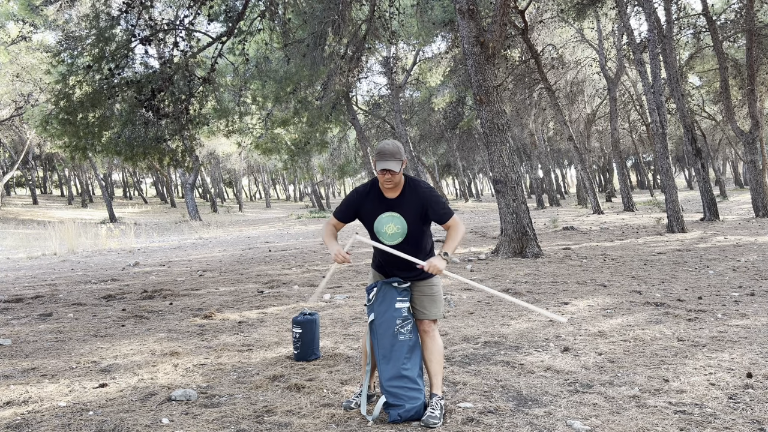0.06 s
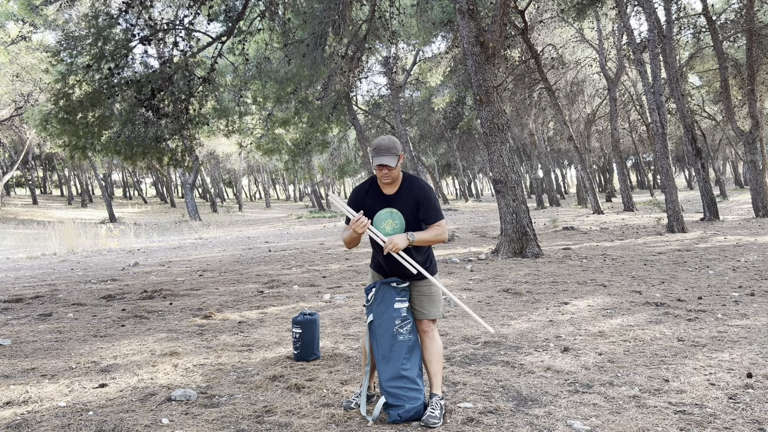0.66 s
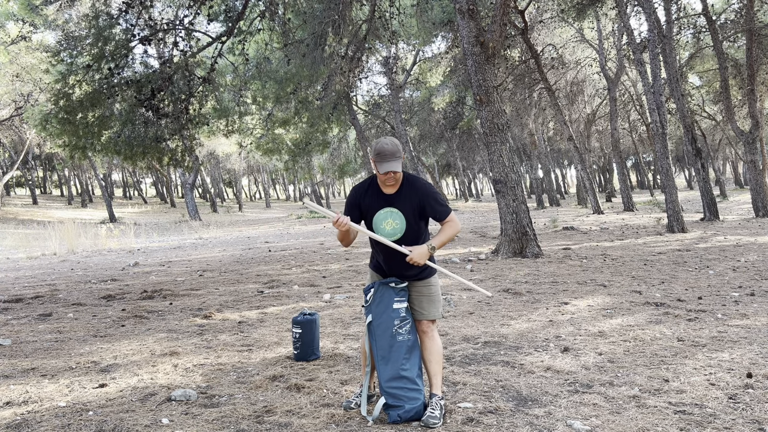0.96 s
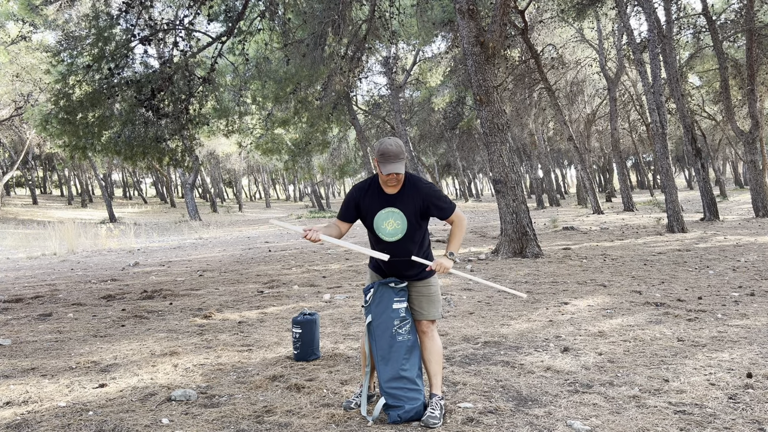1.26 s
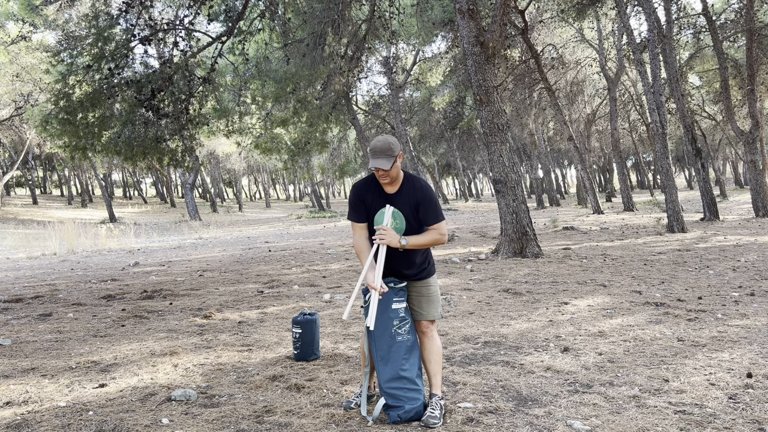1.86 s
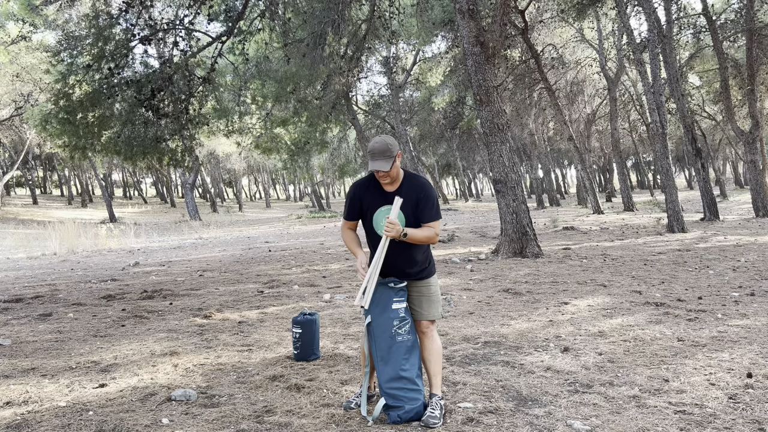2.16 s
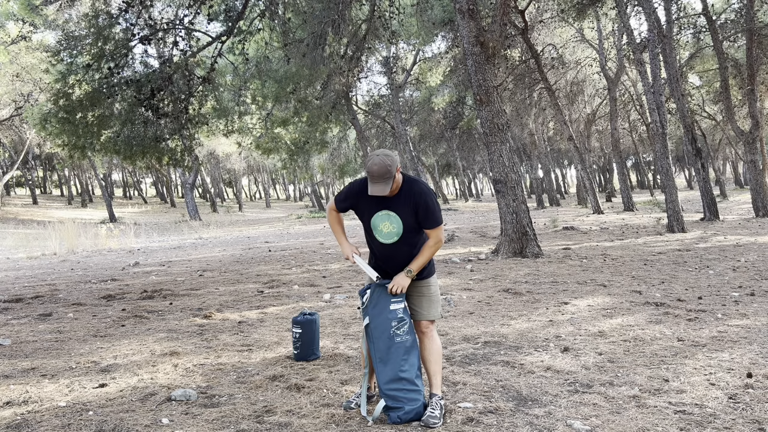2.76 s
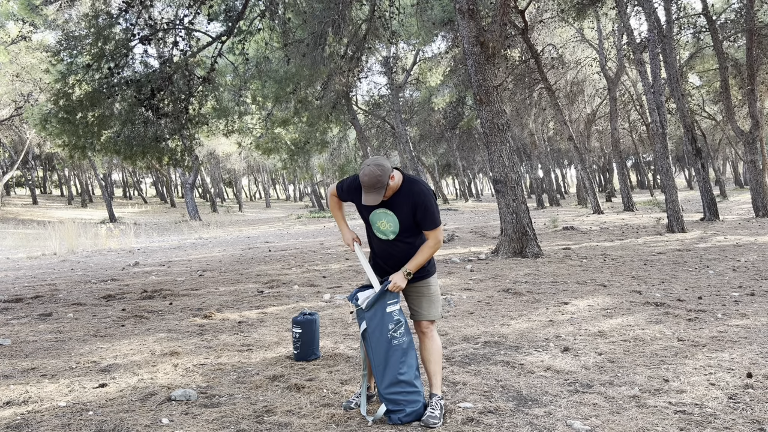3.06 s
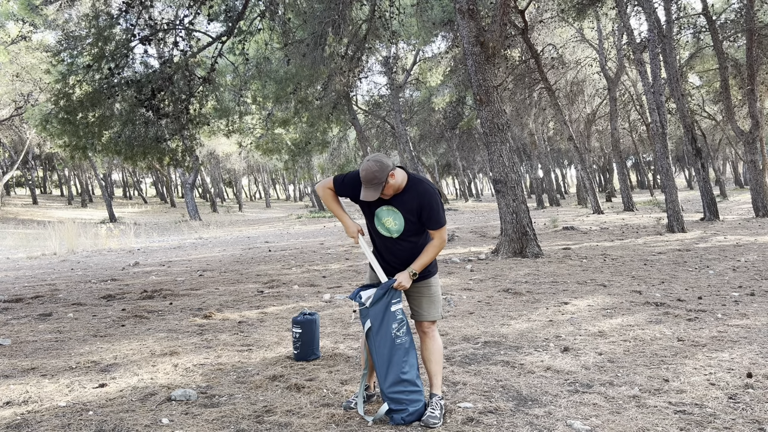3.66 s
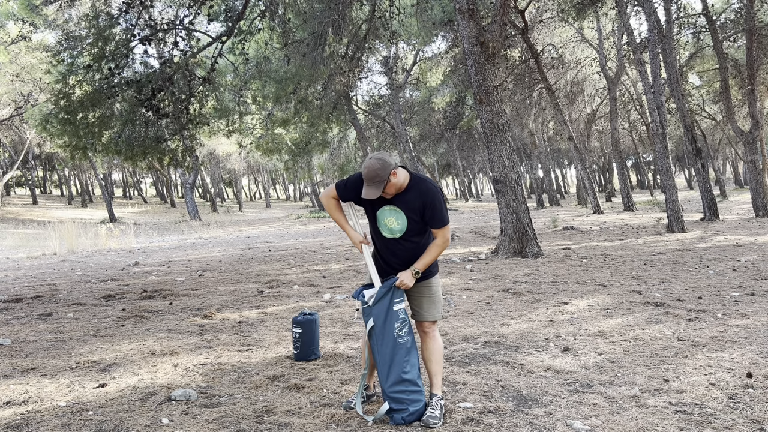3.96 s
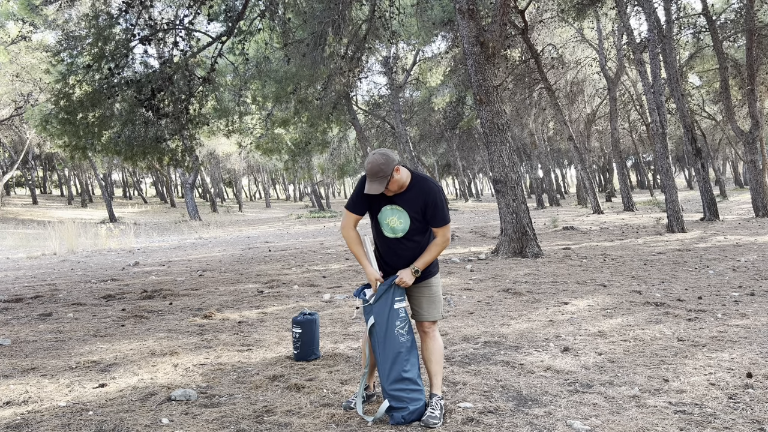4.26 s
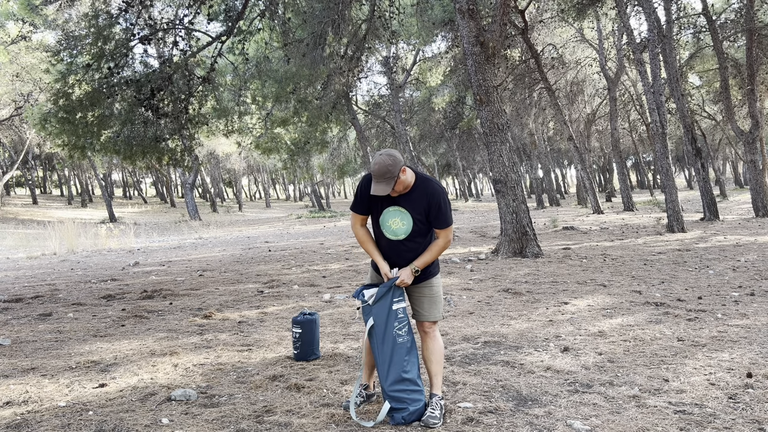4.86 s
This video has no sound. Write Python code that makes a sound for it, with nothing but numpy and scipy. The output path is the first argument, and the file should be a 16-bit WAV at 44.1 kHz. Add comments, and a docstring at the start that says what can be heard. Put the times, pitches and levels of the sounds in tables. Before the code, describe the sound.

In a wood full of buzzing cicadas, with a faint engine drone in the distance, metal poles are gathered a few metres from the microphone. They clink and knock in irregular clusters over a low early breeze. One squeaks lightly, then the poles go into a cloth bag with rustling, small pops and dull thumps, rubbing and squealing briefly before a few last clicks.

```python
"""Metal camp bed poles are packed into a fabric bag in a pine wood.
From the start cicadas buzz, a far engine drones and a breeze pushes on the microphone.
The poles are pulled apart and gathered: they clack together and ring briefly in the hand.
Around 2 s the breeze dies down and a rubbed pole squeaks. From about 2.8 s the bag rustles and
snaps as the poles thump into it, and from 4 s they slide along each other, hissing and squealing."""
import sys
import numpy as np
from scipy import signal
from scipy.fft import rfft, irfft
from scipy.io import wavfile

SR = 44100
rng = np.random.default_rng(int(sys.argv[2]) if len(sys.argv) > 2 else 0)


def wav_record(signal):
    """Record a signal, one row per channel, as 16-bit PCM in the file named by sys.argv[1]."""
    frames = np.transpose(np.atleast_2d(signal))
    bounded = np.clip(frames, -1, 1)
    # unit amplitude maps onto the largest positive 16-bit level
    quanta = np.round(bounded * 32767).astype(np.int16)
    wavfile.write(sys.argv[1], SR, quanta)


N = 225586
TIME = np.arange(N) / SR

# Tone of the air in the wood: pitch_hz, level_db
AIR_TONE = [(20, -19), (35, 2.5), (85, -1.5), (140, -3.5), (200, -6.5), (300, -13.5), (450, -11), (630, -8),
            (1000, -13.5), (1400, -19), (2000, -22), (4000, -80), (16000, -71)]
# The breeze dying down: time_s, level_db
BREEZE_LEVELS = [(0, -22), (1.8, -27), (2.2, -41.5), (5.12, -43)]
# Tone of gusts on the microphone: pitch_hz, level_db
GUST_TONE = [(0, -17), (2, 4.5), (5, 3), (10, -12), (20, -46), (35, -53), (100, -99), (400, -110)]
# Tone of the cicada chorus: pitch_hz, level_db
CICADA_TONE = [(1900, -25), (2700, -11.5), (3450, -6.5), (4000, -15), (4850, -15.5), (5400, -4),
               (6250, 2.5), (6900, -2.5), (7700, -12), (9600, -15.5), (11000, -20.5), (11800, -28.5),
               (14000, -34), (15800, -41)]
# Pole hits pole: start_s, strength_db, brightness_db, top_treble_db, favoured_pitch_hz, contact_s,
# looseness (a looser grip multiplies the ring time)
POLE_HITS = [(0.0458, -38, 0, 0.5, 3930, 0.0081, 0.72), (0.083, -45.5, 1, -3, 2630, 0.011, 0.77),
             (0.1084, -45.5, 7.5, 3, 3740, 0.0051, 0.9), (0.1665, -36.5, 0, -4, 2390, 0.0034, 0.76),
             (0.1702, -32, 12, 3, 3330, 0.0079, 0.41), (0.254, -43.5, 8.5, 8, 4350, 0.0069, 0.79),
             (0.2975, -28.5, 12, 3.5, 4500, 0.0074, 0.94), (0.3057, -31, 6, 0, 4560, 0.0025, 0.75),
             (0.3187, -37, 15, 6, 5915, 0.0059, 0.66), (0.87, -55, 0, -2, 3740, 0.0061, .8),
             (1.125, -53, 4, 1, 4610, 0.0063, 1.9), (1.1702, -49, 5.5, 7, 2720, 0.0063, 0.42),
             (1.542, -39.5, -7, 5, 2450, 0.013, 1), (1.5776, -48, -2, -3, 1625, 0.002, 0.79),
             (1.725, -41, 6.5, 5, 2790, 0.0046, 1.3), (1.752, -38.5, 1.5, -4, 1440, 0.0077, 0.81),
             (1.8015, -41.5, 5, -6, 4830, 0.0031, 0.73), (1.832, -50, 1, -7, 1440, .004, 1.),
             (1.8914, -29.5, 0, 3.5, 2520, .011, 0.7), (2.141, -48.5, -2, -1, 2330, 0.0075, 0.99),
             (2.3885, -30.5, 3, -4.5, 2050, 0.011, 0.45), (3.1039, -26.5, -0.5, 3.5, 1570, 0.013, 0.58),
             (3.1153, -27.5, -0.5, -4, 2340, 0.011, 0.43), (3.1914, -48.5, 0, 0, 3550, 0.0096, 1),
             (3.9505, -30.5, 0, -1.5, 3700, 0.0062, 0.37), (4.146, -29.5, -1, 0.5, 2354, 0.01, 0.34),
             (4.2025, -46, -2, 1, 2530, 0.0089, 1.1), (4.2412, -42.5, 2, -2, 3540, .007, 1.1),
             (4.308, -32.5, 0, -9, 3450, 0.01, 1.15), (4.427, -30, -3.5, 6, 2335, 0.0076, 0.66),
             (4.4664, -27.5, -4.5, 6.5, 2450, 0.012, 0.57), (4.5094, -38, -7.5, 1, 2480, 0.0026, 0.51),
             (4.862, -46.5, 1, -3, 3470, 0.0026, 1.), (4.9942, -37.5, 2.5, 10.5, 3760, .0055, 0.98),
             (5.0795, -34, 0, -4, 1180, 0.0099, 0.8)]
# The notes a tube rings at: pitch_hz, level_db, ring_s (time to fade by 60 dB)
TUBE_NOTES = [(1190, -22.5, 0.06), (1456, -2.5, 0.14), (1576, -4.5, 0.049), (1671, -13, 0.15),
              (1904, -11, 0.11), (2042, -5, 0.044), (2322, -4.5, 0.14), (2450, -4, 0.077),
              (2670, -25.5, 0.11), (2768, -7, 0.077), (3270, -16, 0.076), (3426, 0.5, 0.083),
              (3547, -10, 0.22), (3733, 0.5, 0.029), (4700, -6.5, 0.2), (4747, -12.5, 0.11),
              (5902, -2.5, 0.072), (7420, -12, 0.14), (8140, -7, 0.18), (8770, -6, 0.07), (9500, -9, 0.075),
              (10150, -11, 0.075), (10800, -34, 0.084), (10900, -11.5, 0.067), (11730, -15.5, 0.04),
              (12600, -15, 0.056)]
# Tone of metal striking metal: pitch_hz, level_db
CONTACT_TONE = [(80, -20), (200, -3), (700, 4), (1150, -4.5), (1600, -7.5), (2400, -2.5), (3600, -1),
                (4500, -3), (5300, -10), (7500, -23.5), (10000, -14), (13000, -22), (16000, -37)]
# Borders between a hit's thud, body, clink and sparkle: pitch_hz
BAND_EDGES_HZ = [950, 2900, 6800]
# The two notes that lead in most hits: low_hz, high_hz
LEAD_HZ = (2405, 3386)
# A rubbed tube catches and sings: start_s, length_s, pitch_hz, level_db
SQUEALS = [(2.075, 0.015, 1900, -45.5), (2.139, .018, 1860, -48), (4.025, 0.12, 2330, -53),
           (4.219, 0.058, 2490, -44), (4.431, 0.038, 2303, -31), (4.465, 0.033, 2504, -32.5)]
# Higher notes that join in: pitch_hz, level_db (against the main note of a hard squeal)
SQUEAL_HIGH_NOTES = [(3455, -2), (4620, -9.5), (9036, -13), (11150, -11.5)]
# The bag is tugged over the poles: start_s, hold_s, level_db
BAG_TUGS = [(2.76, 0.34, -53), (3.13, 0.23, -52.5), (3.38, 0.54, -59), (3.96, 0.41, -53),
            (4.425, 0.05, -36.5), (4.72, 0.17, -54)]
# Tone of rubbing cloth: pitch_hz, level_db
CLOTH_TONE = [(80, 3.5), (200, -4), (550, 8.5), (900, -3), (1500, -1.5), (2600, -14), (6000, -12),
              (15000, -29)]
# The cloth snaps tight: start_s, level_db, fade_s
CLOTH_SNAPS = [(2.845, -46, .0026), (2.911, -47.5, 0.0044), (2.952, -48.5, 0.0029), (3.033, -46, 0.006),
               (3.054, -50.5, .004), (3.143, -43.5, 0.0078), (3.28, -48.5, 0.0046), (3.384, -48.5, .008),
               (3.495, -43, 0.0017), (3.624, -45.5, 0.0061), (3.87, -51.5, 0.0065), (3.995, -46, .005)]
# Tone of a snap: pitch_hz, level_db
SNAP_TONE = [(120, -16), (350, 3), (700, 6), (1400, 2.5), (2100, 2.5), (2800, -6.5), (5000, 0),
             (14000, -32)]
# A pole bumps the ground through the bag: start_s, level_db, pitch_hz
GROUND_THUMPS = [(3.107, -45.5, 286), (3.949, -47, 304), (4.428, -40, 180), (4.468, -54, 208)]
# A pole slides along the others: start_s, hold_s, level_db
POLE_SLIDES = [(4.0, 0.077, -54), (4.2, .15, -51), (4.38, 0.16, -50.5)]
# Tone of the sliding hiss: pitch_hz, level_db
SLIDE_TONE = [(300, -8), (1500, 4), (2500, 1), (5000, -27), (9000, -1), (12000, -8), (16000, -18)]


def amp(db):
    """Turns decibels into a number to multiply by."""
    return 10 ** (np.asarray(db) / 20)


def unit(x):
    """Scales a sound to an average (rms) level of 1."""
    return x / np.sqrt(np.mean(x ** 2) + 1e-20)


def colour(x, tone):
    """Shapes the lows and highs of a sound by a tone table, at level 1."""
    hz, db = np.transpose(tone)
    f = np.fft.rfftfreq(len(x), 1 / SR)
    gain = amp(np.interp(np.log(f + 1), np.log(hz + 1), db))
    return unit(irfft(rfft(x) * gain, len(x)))


def wander(rate_hz):
    """A smooth random wobble, up to about rate_hz swings a second."""
    f = np.fft.rfftfreq(N, 1 / SR)
    return unit(irfft(rfft(rng.standard_normal(N)) / (1 + (f / rate_hz) ** 4), N))


def add(mix, start_s, sound):
    """Lays a sound into the mix."""
    part = mix[max(round(start_s * SR), 0):][:len(sound)]
    part += sound[:len(part)]


def at_level(x, db, first_s=0.019):
    """Scales a hit so that its first moments have the given level."""
    return x * amp(db) / np.sqrt(np.mean(x[:int(first_s * SR)] ** 2) + 1e-20)


def bands(x):
    """Splits a hit, low to high, into thud, body, clink and sparkle."""
    for edge_hz in BAND_EDGES_HZ:
        yield signal.sosfilt(signal.butter(8, edge_hz, fs=SR, output="sos"), x)
        x = signal.sosfilt(signal.butter(8, edge_hz, "high", fs=SR, output="sos"), x)
    yield x


def strokes(rows, rise_s, fade_s):
    """Loudness of hand movements: each swells, holds and dies away."""
    loudness = np.zeros(N)
    for start_s, hold_s, db in rows:
        swell = 1 - np.exp(-np.maximum(TIME - start_s, 0) / rise_s)
        fade = np.exp(-np.maximum(TIME - start_s - hold_s, 0) / fade_s)
        loudness += amp(db) * swell * fade
    return loudness


def air_and_breeze(air_db=-52):
    """Air makes a low, steady wash while gusts press on the microphone."""
    wash, gusts = rng.standard_normal((2, N))
    breeze = amp(np.interp(TIME, *np.transpose(BREEZE_LEVELS))) * signal.windows.tukey(N, .03)
    return amp(air_db) * colour(wash, AIR_TONE) + breeze * colour(gusts, GUST_TONE)


def cicadas(level_db=-47, buzz_db=0.25, swell_db=-0.06):
    """Countless clicks from the insects' drum-like skins blur into one band of buzzing noise."""
    chorus = rng.standard_normal(N) * amp(buzz_db * wander(260) + swell_db * wander(3.9))
    return colour(chorus, CICADA_TONE) * amp(level_db)


def far_engine(start_hz=58.8, sink_hz_per_s=1.7, drift_hz=1.93, hum_db=-56, octave_db=-60.5):
    """An engine hums on a low note and its octave, sinking in pitch and wavering in loudness."""
    cycles = np.cumsum(start_hz - sink_hz_per_s * TIME + drift_hz * wander(6.1)) / SR
    return sum(amp(db) * unit((1 + 0.3 * wander(3.1)) * np.sin(2 * np.pi * multiple * cycles))
               for multiple, db in ((1, hum_db), (2, octave_db)))


def clack(levels_db, favoured_hz, contact_s, looseness, ring_db, rise_s=.0007):
    """Two tubes chatter, then ring; the spot that is struck favours some notes over the rest."""
    t = np.arange(SR // 3) / SR
    hz, db, ring_s = np.array(TUBE_NOTES).T[:, :, None]
    chance, detune, phase = rng.standard_normal((3, len(TUBE_NOTES), 1))
    # The favoured pitch takes over from the nearer leading note.
    low_hz, high_hz = LEAD_HZ
    if favoured_hz < np.mean(LEAD_HZ):
        low_hz = favoured_hz
    else:
        high_hz = favoured_hz
    favour = np.exp(-((hz - low_hz) / 70) ** 2) + np.exp(-((hz - high_hz) / 90) ** 2)
    strength = amp(db * (1 - 0.71 * favour) - 0.1 * chance + 8 * favour)  # even a weak note can lead
    # While the tubes touch, their notes are broad humps that colour the chatter.
    f = np.fft.rfftfreq(len(t), 1 / SR)
    humps = (strength / (1 + ((f - hz) / 60) ** 2)).sum(0)
    crack = colour(rng.standard_normal(len(t)), CONTACT_TONE)
    chatter = unit(irfft(rfft(crack) * (1 + amp(6) * humps), len(t)))
    chatter /= 1 + (t / contact_s) ** 3
    # A tight grip stops the ring quickly; a faint tail lasts three times as long.
    fall_db = 60 * t / (ring_s * looseness * (1 + 0.096 * favour))
    fade = amp(-fall_db) + amp(-25 - fall_db / 3)
    # No two poles are tuned alike, least of all in their highest notes.
    tuning = 1 + detune * (0.0038 + 0.0069 * (hz > BAND_EDGES_HZ[-1]))
    ring = (strength * fade * np.sin(2 * np.pi * (hz * tuning * t + phase))).sum(0)
    hit = (chatter + amp(ring_db) * ring) * (1 - np.exp(-(t / rise_s) ** 2))
    return sum(at_level(part, level) for part, level in zip(bands(hit), levels_db))


def pole_clacks(bagged_from_s=2.8, sparkle_db=-12.5):
    """The poles knock together, with a heavier thud once they are going into the bag."""
    out = np.zeros(N)
    for start_s, db, bright_db, treble_db, favoured_hz, contact_s, looseness in POLE_HITS:
        body_db, clink_db = db - bright_db / 2, db + bright_db / 2
        # The thud is set against the body, the ring against the chatter.
        thud_db, ring_db = (-14, -10) if start_s > bagged_from_s else (-20.5, -10.5)
        levels_db = (body_db + thud_db, body_db, clink_db, db + sparkle_db + treble_db)
        add(out, start_s, clack(levels_db, favoured_hz, contact_s, looseness, ring_db))
    return out


def pole_squeals(hard_squeal_db=-33, pitch_waver=0.01, flutter_db=5.0):
    """A tube sticks and slips, singing one shaky note; harder rubbing wakes higher notes."""
    out = np.zeros(N)
    wobbles = [(wander(140), wander(98)) for _ in range(len(SQUEAL_HIGH_NOTES) + 1)]
    for start_s, length_s, main_hz, db in SQUEALS:
        span = slice(round(start_s * SR), round((start_s + length_s) * SR))
        high_db = db + (db - hard_squeal_db)  # softer squeals are purer
        notes = [(main_hz, db)] + [(hz, high_db + offset_db) for hz, offset_db in SQUEAL_HIGH_NOTES]
        for (hz, note_db), (bend, flutter) in zip(notes, wobbles):
            cycles = np.cumsum(hz * (1 + pitch_waver * bend[span])) / SR
            tone = np.sin(2 * np.pi * cycles) * amp(flutter_db * flutter[span])
            add(out, start_s, amp(note_db) * unit(tone * signal.windows.tukey(len(tone), .5)))
    return out


def bag_rustle(slips_per_s=2500, spread_db=1.7, clump_db=3):
    """Tugged cloth rubs in tiny slips of uneven size that come in clumps."""
    sizes = amp(spread_db * np.minimum(rng.exponential(1, N), 4)) * rng.standard_normal(N)
    slips = sizes * (rng.random(N) < slips_per_s / SR)
    rustle = colour(slips * amp(clump_db * wander(30)), CLOTH_TONE)
    return rustle * strokes(BAG_TUGS, rise_s=0.032, fade_s=0.037)


def bag_snaps(rise_s=0.0014, hump_db=3.5, hump_spacing_hz=350, dull_above_hz=3000):
    """Folds of the bag pull tight with a dull pop; each fold has a tone of its own."""
    out, t = np.zeros(N), np.arange(4096) / SR
    f = np.fft.rfftfreq(len(t), 1 / SR)
    for start_s, db, fade_s in CLOTH_SNAPS:
        humps_db = hump_db * np.interp(f / hump_spacing_hz, np.arange(64), rng.standard_normal(64))
        fold = amp(humps_db) / np.sqrt(1 + (f / dull_above_hz) ** 4)
        noise = colour(rng.standard_normal(len(t)), SNAP_TONE)
        pop = irfft(rfft(noise) * fold, len(t))
        add(out, start_s, at_level(pop * np.exp(-t / fade_s) * (1 - np.exp(-t / rise_s)), db))
    return out


def ground_thumps(rise_s=0.001, fade_s=0.022):
    """A pole bumps into the bag and the soft ground under it: a dull push with no ring."""
    out, t = np.zeros(N), np.arange(8192) / SR
    for start_s, db, hz in GROUND_THUMPS:
        tone = [(hz / 2, -24), (hz, 0), (hz * 2, -14), (hz * 10, -60)]
        earth = colour(rng.standard_normal(len(t)), tone)
        add(out, start_s, at_level(earth * np.exp(-t / fade_s) * (1 - np.exp(-t / rise_s)), db))
    return out


def pole_slides(clump_db=4.0):
    """Metal rubbing on metal hisses and keeps the tube's notes ringing."""
    t = np.arange(SR // 4) / SR
    rub = rng.standard_normal(N) * amp(clump_db * wander(40))
    tube = sum(amp(db - 60 * t / ring_s) * np.sin(2 * np.pi * hz * t) for hz, db, ring_s in TUBE_NOTES)
    ring = unit(signal.oaconvolve(rub, tube)[:N])
    hiss = colour(rub, SLIDE_TONE)
    return (ring + hiss) * strokes(POLE_SLIDES, rise_s=0.021, fade_s=0.019)


def with_wood_echoes(x, echo_db=-20, echoes_per_s=1500, tail_s=0.34, dull_above_hz=4000):
    """Faint echoes come back from the ground and trunks; pine needles swallow the treble."""
    t = np.arange(SR // 2) / SR
    echoes = rng.standard_normal(len(t)) * (rng.random(len(t)) < echoes_per_s / SR) * (t > .006)
    needles = signal.butter(1, dull_above_hz, fs=SR, output="sos")
    echoes = signal.sosfilt(needles, echoes * amp(-60 * t / tail_s))
    return x + amp(echo_db) * signal.oaconvolve(x, echoes / np.linalg.norm(echoes))[:N]


def scene():
    """The packing, a few metres away, among the sounds of the wood."""
    background = air_and_breeze() + cicadas() + far_engine()
    packing = (pole_clacks() + pole_squeals() + bag_rustle() + bag_snaps()
               + ground_thumps() + pole_slides())
    return (background + with_wood_echoes(packing))[None]


def record(dry, top_hz=15800):
    """Cuts away the very highest treble."""
    lowpass = signal.firwin(511, top_hz, window=("kaiser", 9), fs=SR)
    return signal.oaconvolve(dry, lowpass[None], "same")


dry = scene()
out = record(dry)
wav_record(out)
```